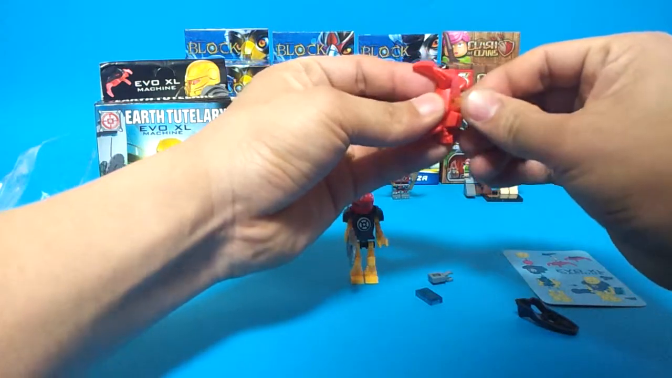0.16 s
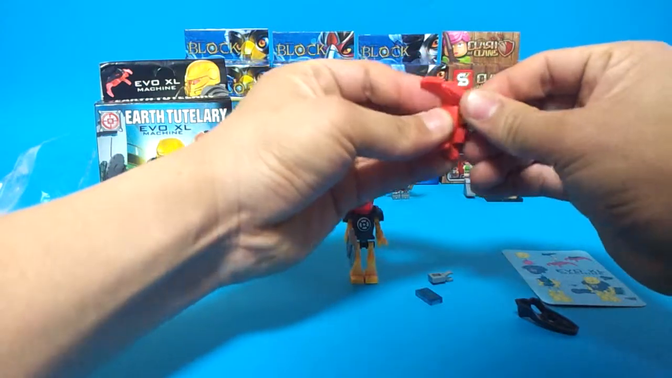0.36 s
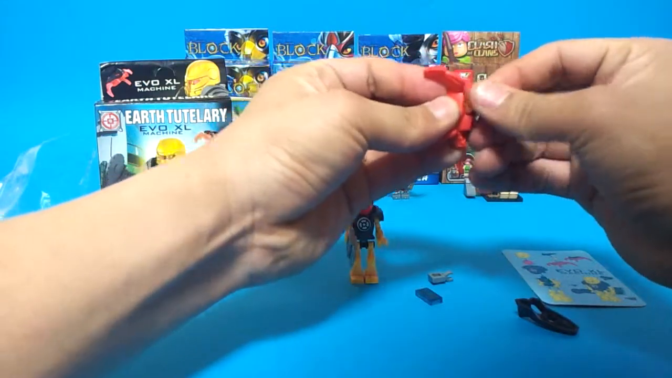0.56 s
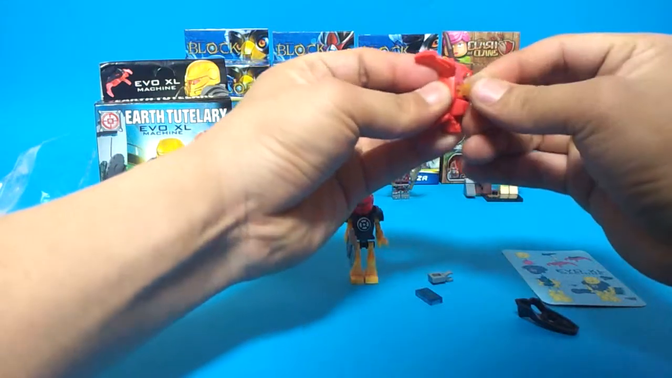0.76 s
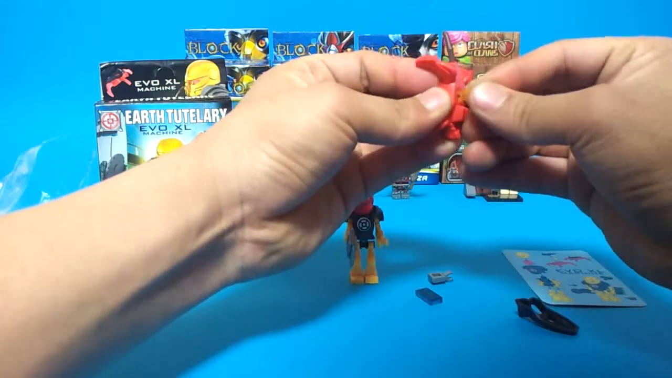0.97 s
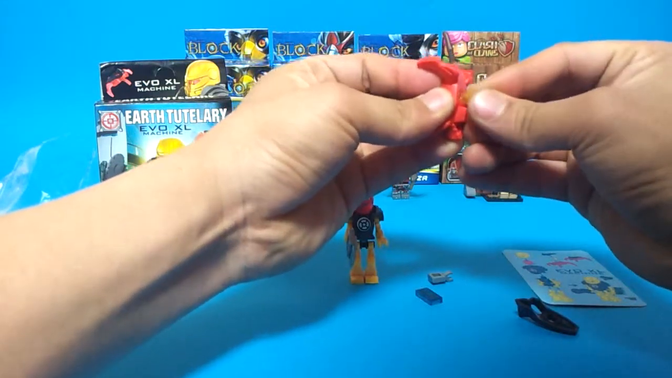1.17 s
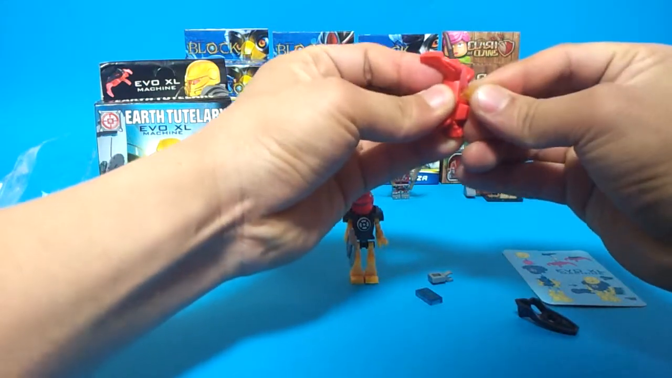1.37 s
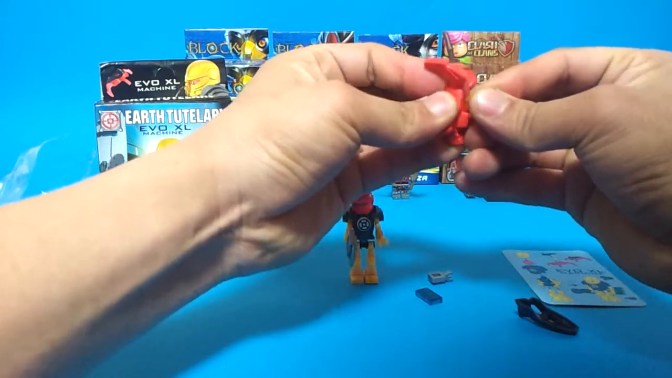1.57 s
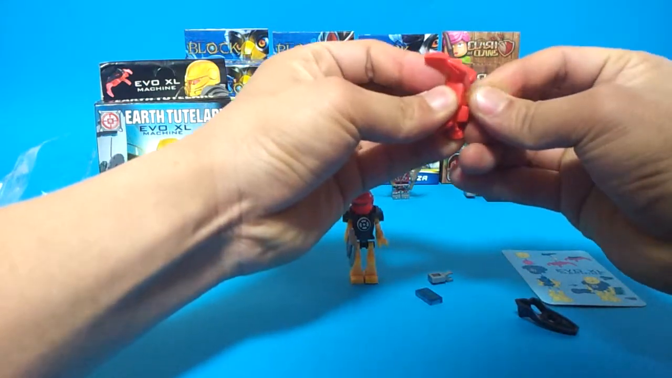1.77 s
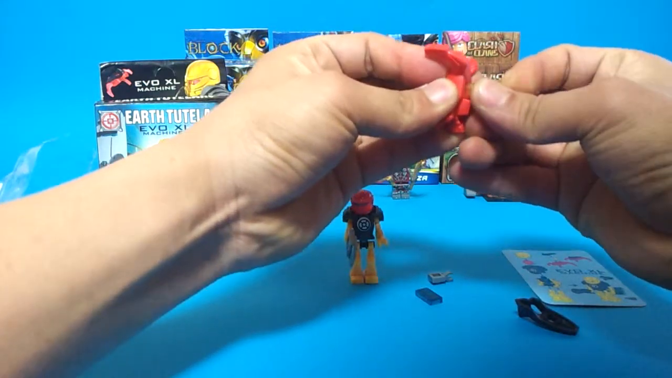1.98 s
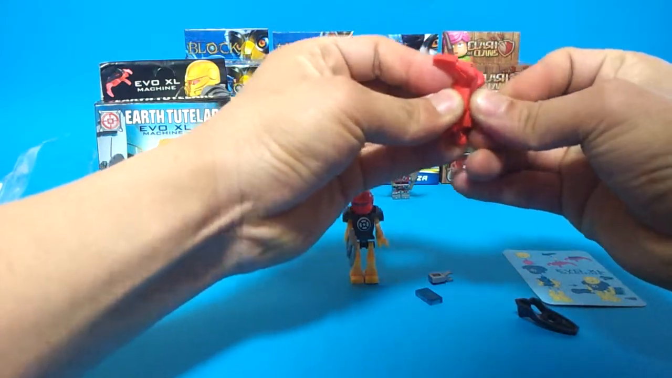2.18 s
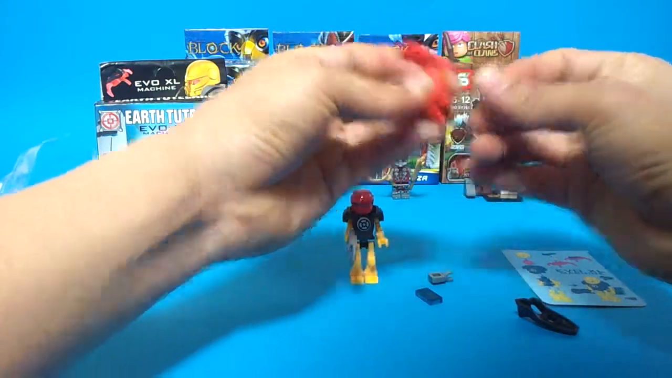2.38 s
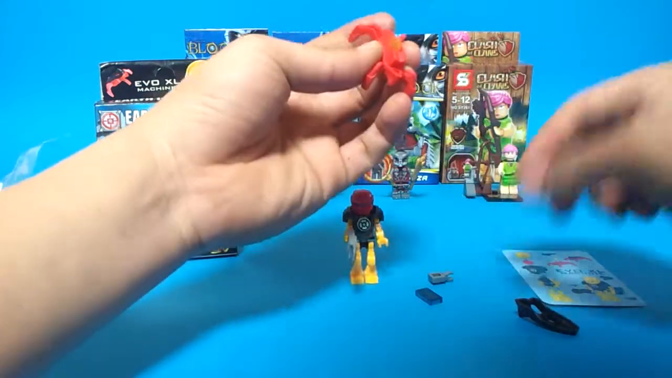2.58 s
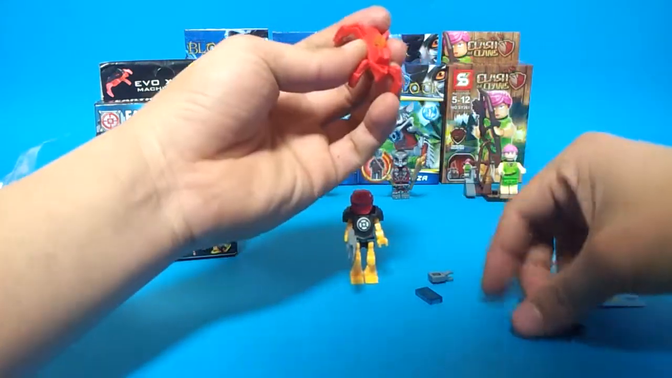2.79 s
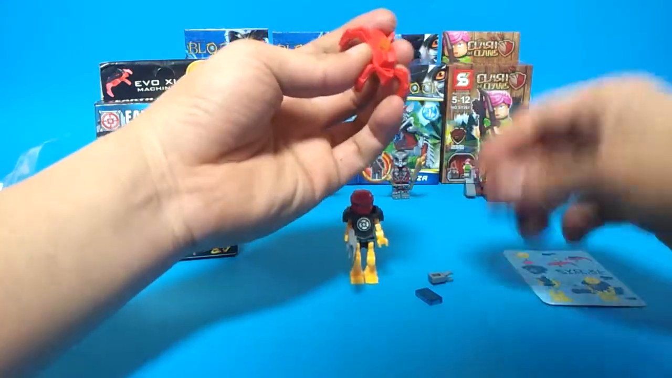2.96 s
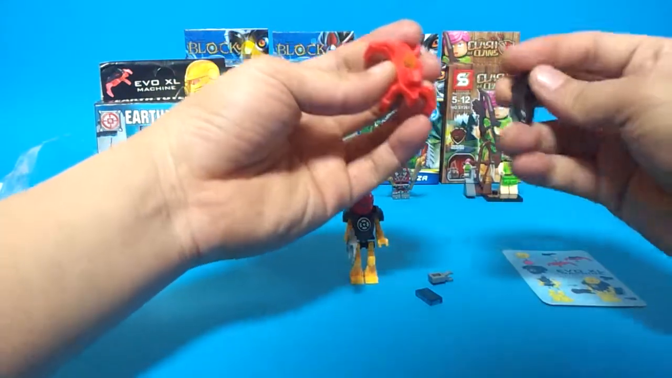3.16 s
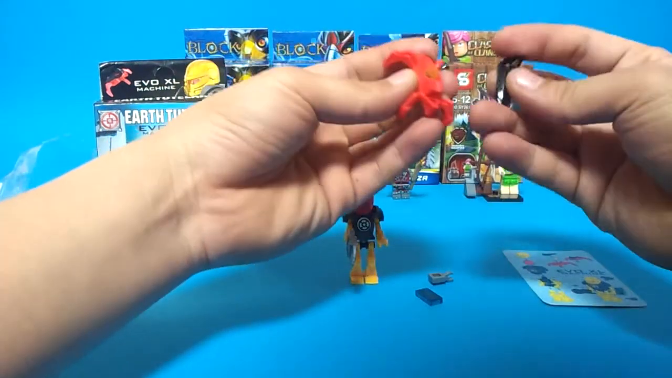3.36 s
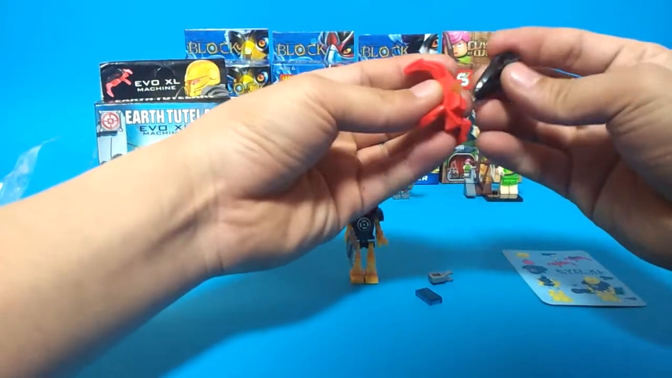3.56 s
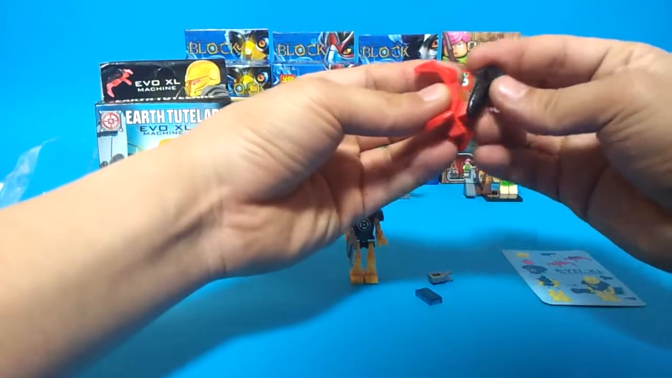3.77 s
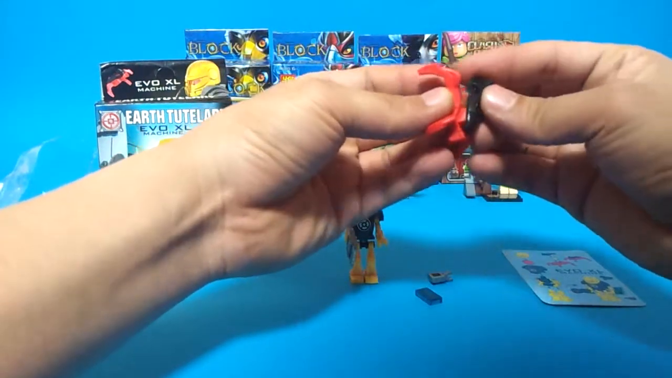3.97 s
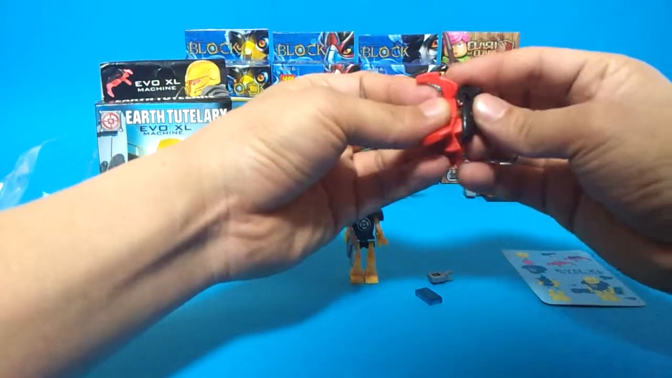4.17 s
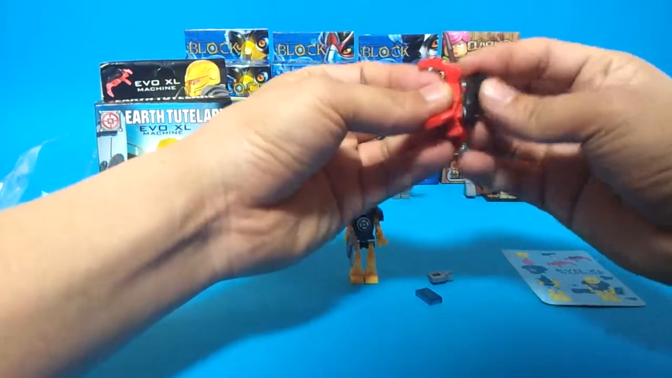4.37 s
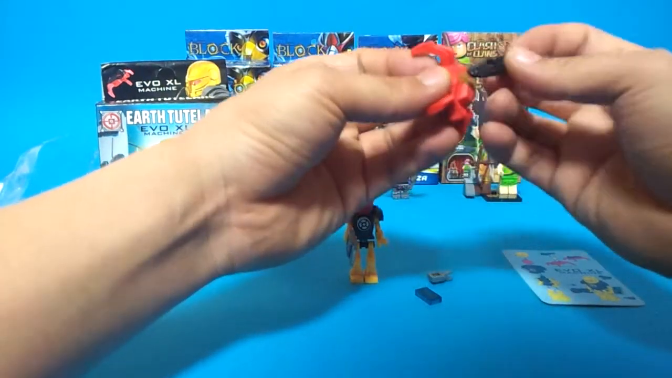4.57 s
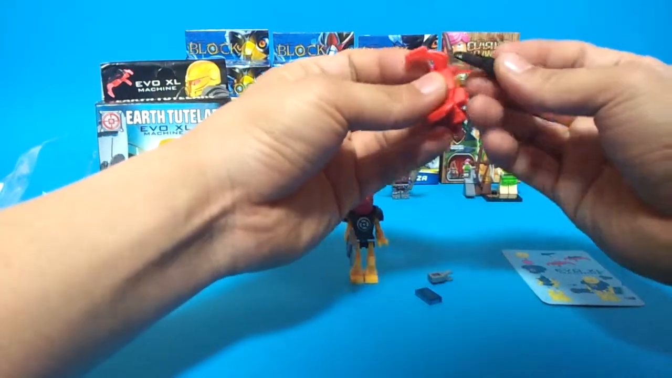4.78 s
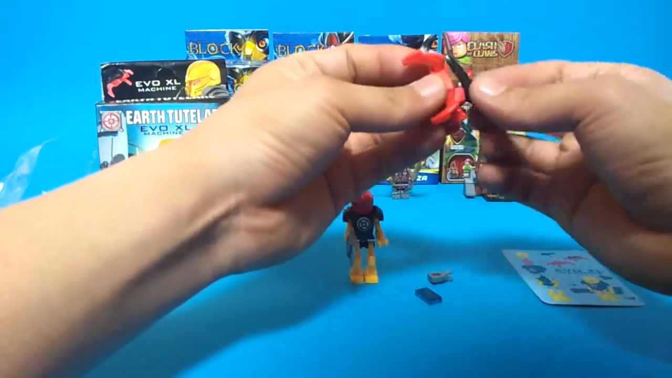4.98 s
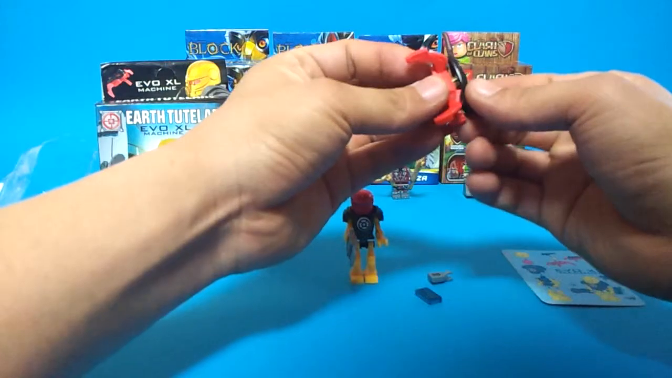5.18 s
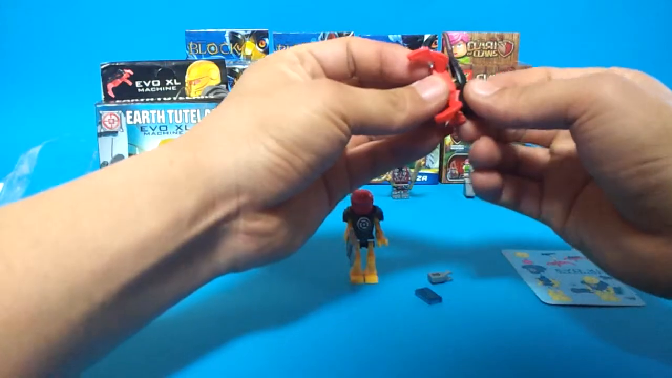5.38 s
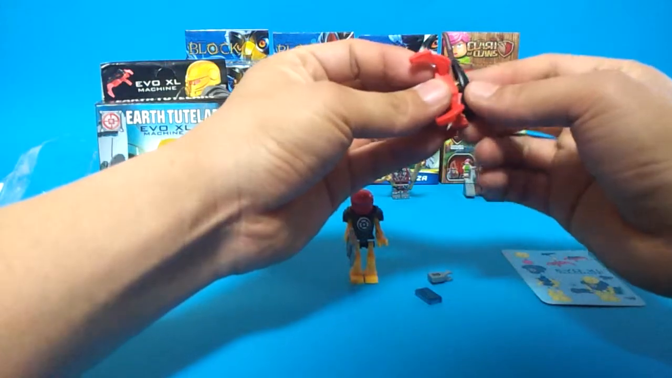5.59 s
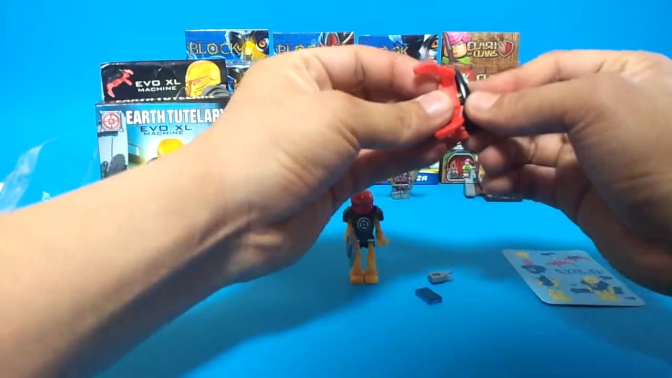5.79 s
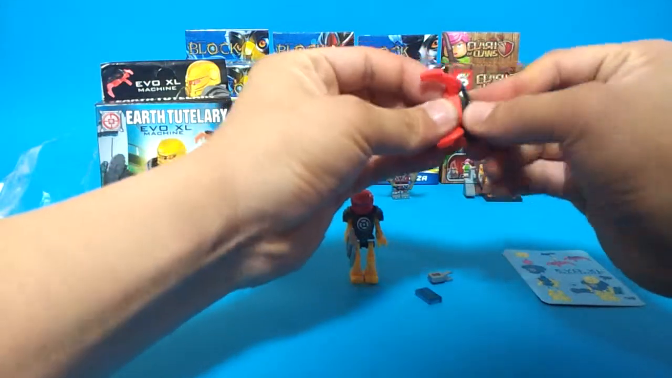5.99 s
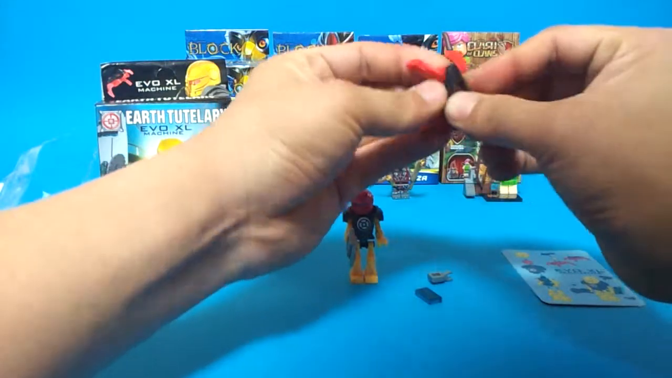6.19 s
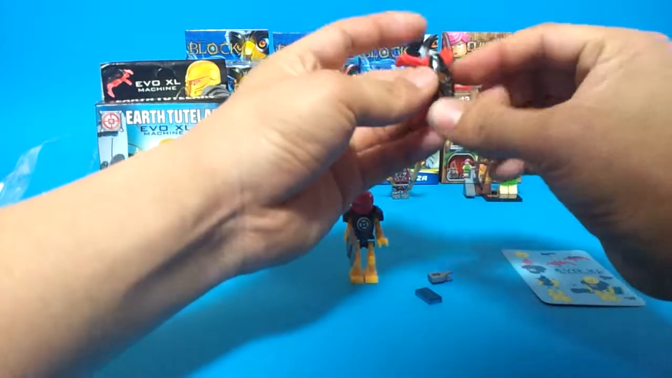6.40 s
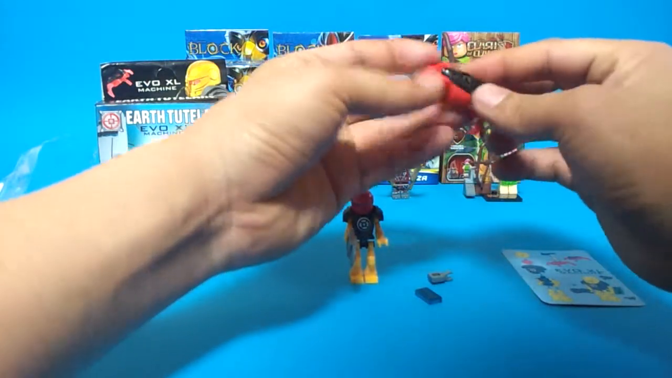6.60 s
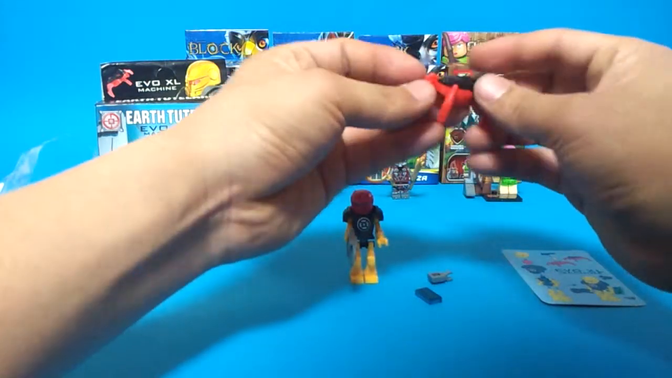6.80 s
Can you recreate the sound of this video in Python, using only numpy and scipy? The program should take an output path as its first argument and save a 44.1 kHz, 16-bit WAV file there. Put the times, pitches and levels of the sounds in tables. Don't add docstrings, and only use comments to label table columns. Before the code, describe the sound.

A small, quiet room heard through one close microphone, with steady soft hiss, faint low rumble and a barely wavering fan hum. Very soft bumps and a faint plastic tick come in the first 0.4 s, then near silence until a crisp thin tick at 1.57 s. At 2.09 s a loud, bright plastic snap cracks with a small hollow body and a quick near-wall answer. A tiny tick at 2.35 s, then muffled low arm bumps on the table from 2.5 to 2.8 s. At 2.8 s a part ticks and scrapes briefly off a card, gone by 2.9 s. Quiet follows until a light tick at 4.08 s, a faint one at 4.63 s, and scattered small slips from 4.9 to 5.2 s. At 5.97 s a second loud snap, broader, deeper and clustered, lands with a hollow table knock. Weak ticks trail at 6.13 to 6.4 s and 6.72 s.

```python
import sys
import numpy as np
from scipy import signal
from scipy.fft import rfft, irfft, next_fast_len
from scipy.io import wavfile

SR = 44100
rng = np.random.default_rng(int(sys.argv[2]) if len(sys.argv) > 2 else 0)


def unload_wav(signal):
    wavfile.write(
        sys.argv[1],
        SR,
        np.round(np.clip(np.atleast_2d(signal).T, -1, 1) * 32767).astype(np.int16),
    )


def amplitude_ratio(level_db):
    exponent = np.asarray(level_db, float) / 20
    return 10 ** exponent


N = 302085


def add(out, start_s, sound):
    i = int(start_s * SR)
    out[i:i + len(sound)] += sound[:N - i]


def peak(x, db):
    return x * amplitude_ratio(db) / np.max(np.abs(x))


def noise(gain):
    size = next_fast_len(N)
    hz = np.maximum(np.arange(size // 2 + 1) * SR / size, 1)
    x = irfft(rfft(rng.standard_normal(size)) * gain(hz), size)[:N]
    return x / np.std(x)


def background():
    # frequency in Hz, level in dB per Hz.
    floor = [(15, -67), (25, -48), (34, -34), (54, -9), (92, -10.5), (123, -2.5), (148, -6.5), (188, -9),
             (221, 0), (252, -5.5), (386, -8.5), (856, -16), (1150, -16), (2680, -21.5), (14300, -25)]
    # frequency in Hz, width in Hz, level in dB rms.
    fan = [(125.1, 10.4, -69), (226.4, 6.1, -70.5)]
    floor_db = -56.5
    at_hz, db = np.transpose(floor)
    out = amplitude_ratio(floor_db) * noise(lambda hz: amplitude_ratio(np.interp(np.log(hz), np.log(at_hz), db)))
    for tone_hz, width_hz, tone_db in fan:
        out += amplitude_ratio(tone_db) * noise(lambda hz: 1 / (1 + (2 * (hz - tone_hz) / width_hz) ** 2))
    return out


def table():
    # start in seconds, peak level in dB, frequency in Hz.
    arm = [(.005, -53, 50), (.33, -51, 108), (2.505, -47, 65.5), (2.55, -44, 67.5), (2.577, -37, 88),
           (2.585, -43.5, 182), (2.6, -40, 58), (2.626, -49, 110), (2.689, -48.5, 95), (2.748, -42.5, 82),
           (2.768, -40.5, 82)]
    # frequency in Hz, level in dB, T60 in seconds.
    top_modes = [(90, -8, 0.11), (134, -6.5, .16), (250, -3, 0.034), (430, -0.5, 0.034), (616, -6, 0.041)]
    # frequency in Hz, level in dB, T60 in seconds.
    card_modes = [(268, -7, 0.2), (311.5, 0.5, 0.17), (427, -2.5, 0.1), (464, -6.5, 0.17),
                  (627, -14.5, .09)]
    # start in seconds, peak level in dB, rise in cycles.
    top_knocks = [
        (5.974, -34.5, 0.84),
    ]
    card_knocks = [
        (2.089, -54, 0.35),
        (2.818, -44, 2.6),
    ]
    arm_rise_cycles, arm_t60_s = 0.72, 0.083
    mic_low_hz = 42

    bumps = [(s, db, hz, arm_rise_cycles / hz, arm_t60_s) for s, db, hz in arm]
    for knocks, modes in ((top_knocks, top_modes), (card_knocks, card_modes)):
        for s, knock_db, cycles in knocks:
            bumps += [(s, knock_db + db, hz, cycles / hz, t60_s) for hz, db, t60_s in modes]

    out = np.zeros(N)
    t = np.arange(SR // 3) / SR
    for s, peak_db, hz, rise_s, t60_s in bumps:
        push = 1 - np.exp(-(t / max(rise_s, .001)) ** 2)
        swell = push * np.exp(-np.log(1000) * t / t60_s)
        add(out, s, amplitude_ratio(peak_db) * swell / swell.max() * -np.sin(2 * np.pi * hz * t))
    return signal.sosfilt(signal.butter(2, mic_low_hz, "high", fs=SR, output="sos"), out)


def scrape():
    # time in seconds, level in dB.
    drag = [
        (2.8, -90),
        (2.808, -49.5),
        (2.83, -52.5),
        (2.86, -62),
        (2.885, -61),
        (2.91, -90),
    ]
    s, db = np.transpose(drag)
    hiss = noise(lambda hz: 1 / (1 + (np.log2(hz / 5500) / 1.6) ** 4))
    grain = amplitude_ratio(3.3 * rng.standard_normal(N // 40 + 1)).repeat(40)[:N]
    return hiss * grain * amplitude_ratio(np.interp(np.arange(N) / SR, s, db, -140, -140))


def room(x):
    # delay in seconds, level in dB, smear in seconds.
    walls = [(.0047, -39, .0004), (.008, -32, .0008), (.0097, -33, .0006), (.0155, -37, .001)]
    tail_db, tail_t60_s, tail_start_s = -33, 0.16, .0085
    t = np.arange(SR // 4) / SR
    shape = amplitude_ratio(tail_db - 60 * t / tail_t60_s) * np.clip((t / tail_start_s) ** 3, 0, 1)
    for delay_s, db, smear_s in walls:
        shape = shape + amplitude_ratio(db) * np.exp(-((t - delay_s) / smear_s) ** 2)
    return signal.fftconvolve(x, shape * rng.standard_normal(len(t)))[:N]


def clicks():
    # start in seconds, peak level in dB, brightest Hz, spread in octaves.
    slips = [(.338, -37.5, 6800, .4), (1.5666, -40, 6800, .4), (1.5671, -23, 7300, .22),
             (1.5687, -25, 6300, .17), (1.5676, -33, 10600, .2), (2.0902, -11.5, 3800, 0.43),
             (2.0911, -11, 11000, 0.15), (2.35, -49, 6000, .5), (2.802, -23, 5800, .5),
             (2.878, -46, 7000, .5), (4.0768, -31, 7500, 0.88), (4.631, -44, 7000, .5),
             (4.899, -45, 8000, .33), (4.9584, -28, 6000, 0.2), (4.972, -34, 6000, 0.77),
             (5.055, -45, 6100, .79), (5.178, -42, 7500, .5), (5.1871, -28.5, 8600, 0.39),
             (5.9733, -10, 2600, 1.0), (5.9741, -2.5, 9000, .33), (5.9739, -31, 1060, 0.97),
             (5.9745, -11, 5800, .3), (5.9762, -13, 8000, .25), (6.1314, -33, 4840, 1.1),
             (6.138, -39, 4100, 0.25), (6.154, -42, 8000, .35), (6.272, -50, 8000, .5),
             (6.368, -49, 6500, .5), (6.7197, -47.5, 8000, .5)]
    # start in seconds, peak in dB, brightest Hz, spread in octaves, body in dB.
    snaps = [
        (2.0904, .5, 7000, .24, -26),
        (5.9747, -6, 7750, .2, -20),
    ]
    # lag in seconds, level in dB, brightest Hz, spread in octaves.
    body = [
        (.0001, 1, 2350, .25),
        (.0002, -2, 1180, .25),
    ]
    body_ring_db, body_room_db = -9, -1.5
    ring_base_db, ring_db_per_octave, ring_per_db = -12, -5, -0.28
    faint_db, faint_room_per_db, clear_room_db = -40, 1.3, -3.5

    found = []
    for s, *_, body_db in snaps:
        for lag_s, db, hz, spread in body:
            found.append((s + lag_s, body_db + db, hz, spread, body_ring_db, body_room_db))
    for s, peak_db, hz, spread, *_ in snaps + slips:
        ring_db = ring_base_db + ring_db_per_octave * spread + ring_per_db * peak_db
        room_db = clear_room_db + faint_room_per_db * max(faint_db - peak_db, 0)
        found.append((s, peak_db, hz, spread, ring_db, room_db))
    return found


def parts():
    # frequency in Hz, level in dB, T60 in seconds.
    part_modes = [(900, -27, 0.0062), (1250, 0.5, 0.011), (1590, -31, 0.0045), (2260, -4.5, 0.017),
                  (3200, 0, 0.0095), (3800, -6, 0.008), (4330, -10, 0.0086), (4660, -1, 0.012),
                  (5300, -8, 0.006), (5890, -2, 0.011), (7000, 0, 0.01), (7620, -5.5, 0.016),
                  (8300, -0.5, .006), (9200, -9, 0.01), (10730, -5, 0.0095), (13140, -1, 0.0098)]
    hz, db, t60_s = (column[:, None] for column in np.transpose(part_modes))
    dry, wet = np.zeros(N), np.zeros(N)
    t = np.arange(-128, 896) / SR
    bins = np.maximum(np.fft.rfftfreq(len(t), 1 / SR), 1)
    fade = np.exp(-np.log(1000) * np.abs(t) / t60_s) * np.clip(t / 0.00043, 0, 1)
    events = clicks()
    chance = rng.standard_normal((len(events), 3, len(part_modes), 1))

    for (s, peak_db, top_hz, spread, ring_db, room_db), (drift, weight, turn) in zip(events, chance):
        def colour(f):
            octaves = np.log2(f / top_hz)
            return amplitude_ratio(-6.0 * (octaves / max(spread, .15)) ** 2) + amplitude_ratio(-11.5 - 2.93 * octaves ** 2)

        crack = peak(irfft(colour(bins) * np.exp(2j * np.pi * bins * t[0] + 1j * turn[0])), 0)
        tones = np.sin(2 * np.pi * hz * (1 + 0.015 * drift) * t + 2.47 * turn)
        modes = amplitude_ratio(db + 0.37 * weight) * colour(hz) ** 0.72 * tones
        ring = peak(np.sum(modes * fade, axis=0), ring_db)
        add(dry, s + t[0], amplitude_ratio(peak_db) * (crack + ring))
        add(wet, s + t[0], amplitude_ratio(peak_db + room_db) * (crack + ring / 3))
    return dry, wet


def scene():
    port_hz = 12800
    dry, wet = parts()
    near = dry + room(wet) + scrape()
    near = signal.sosfilt(signal.butter(2, port_hz, fs=SR, output="sos"), near)
    mono = near + table() + background()
    return np.array([mono, mono])


def low_pass(x):
    return signal.sosfilt(signal.butter(12, 15900, fs=SR, output="sos"), x)


def record(dry):
    top_hz = 14650
    cut = signal.sosfilt(signal.ellip(10, .3, 60, top_hz, fs=SR, output="sos"), dry)
    return low_pass(cut)


dry = scene()
out = record(dry)
unload_wav(out)
```